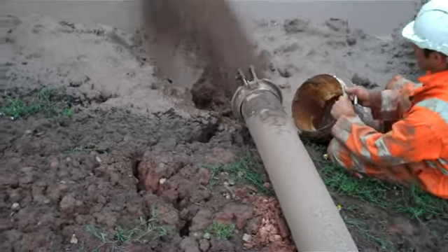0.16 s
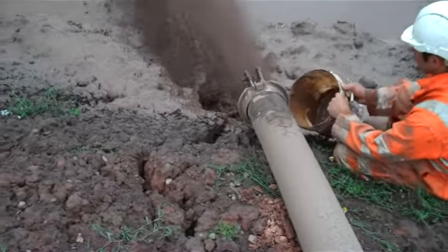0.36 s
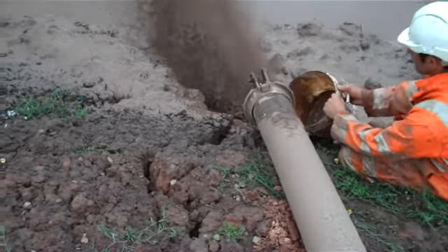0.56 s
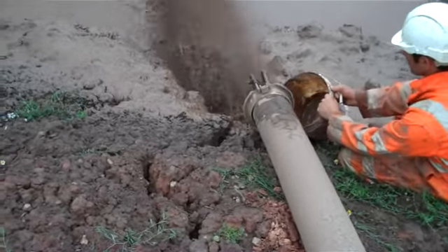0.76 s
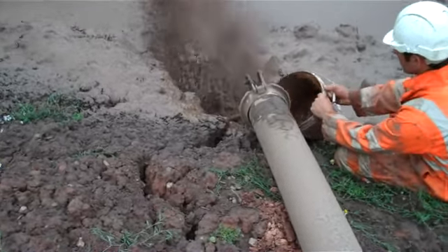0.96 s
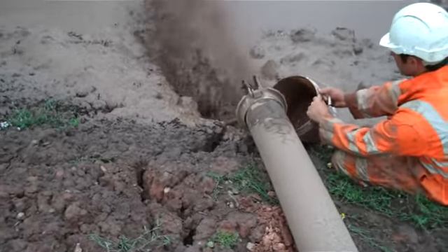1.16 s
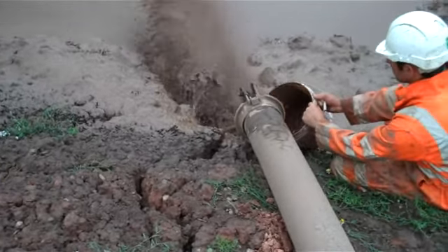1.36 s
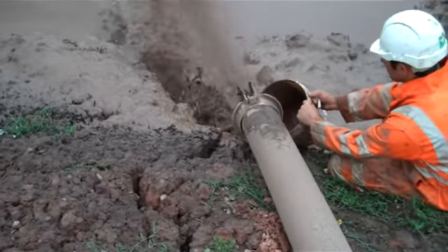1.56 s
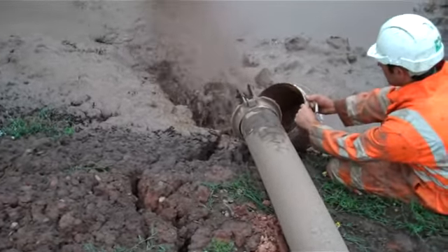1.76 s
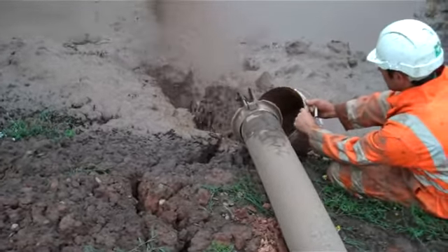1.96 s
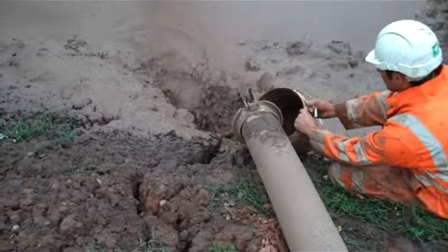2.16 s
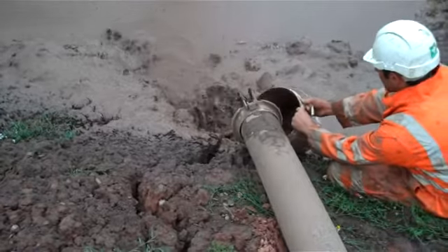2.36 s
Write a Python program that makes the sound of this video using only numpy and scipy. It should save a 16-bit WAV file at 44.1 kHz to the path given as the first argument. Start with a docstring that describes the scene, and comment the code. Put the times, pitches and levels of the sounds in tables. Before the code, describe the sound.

A close outdoor jet of muddy slurry hisses and spits throughout, strongest early, while the landing grows more gulping and lumpy after one second; sharp drops snap, and noise reduction leaves the rush hollow and watery.

```python
"""A jet of thick slurry and air rushes from a discharge pipe and spits fine spray, outdoors and close by.
Where it lands on wet mud it slaps, gulps and gurgles; heavy lumps plop, and a few drops snap sharply.
Spray, jet and landing are rains of damped rings over coloured hiss; air sputters at the mouth.
The recorder's noise reduction hollows the weaker bands, and its overload crisps the sharpest snaps."""
import sys
import numpy as np
from scipy import signal
from scipy.fft import rfft, irfft, next_fast_len
from scipy.io import wavfile
from scipy.ndimage import map_coordinates

SR = 44100
rng = np.random.default_rng(int(sys.argv[2]) if len(sys.argv) > 2 else 0)


def waveform_to_disk(signal):
    """Save audio, clipped to [-1, 1], as 16-bit WAV at the path in sys.argv[1]."""
    frames = np.transpose(np.atleast_2d(signal))
    scaled = np.clip(frames, -1, 1) * 32767
    samples = np.round(scaled).astype(np.int16)
    wavfile.write(sys.argv[1], SR, samples)


N = 110250  # samples, 2.5 s

# Colours shape noise and bubbles before levelling: freq_hz, level_db (relative)

# Fine spray in the air, ahead of SPRAY_TRIM_DB: time_s, level_db
SPRAY_LEVEL = [(0, -24), (.08, -26), (.11, -21.5), (.232, -24.5), (.257, -16), (.325, -16), (.365, -20),
               (.42, -19.5), (.47, -23.5), (.53, -20.5), (.66, -22), (.8, -22.5), (.89, -21), (1.02, -24),
               (1.18, -22), (1.28, -23), (1.32, -26.5), (1.4, -23.5), (1.46, -27.5), (1.55, -22),
               (1.62, -26), (1.7, -21.5), (1.81, -25.5), (1.91, -20.5), (1.96, -24), (2.06, -24),
               (2.19, -24), (2.24, -28.5), (2.27, -23.5), (2.43, -23), (2.5, -26)]
# Colour of the spray: freq_hz, level_db
SPRAY_TONE = [(2500, -50), (3900, -14), (4450, -7.5), (5200, -3.5), (5950, -1.5), (9000, -3)]
# Midrange rush of the jet, ahead of JET_TRIM_DB: time_s, level_db
JET_LEVEL = [(0, -24), (.04, -28.5), (.14, -28), (.21, -24), (.29, -24.5), (.36, -28), (.56, -28.5),
             (.63, -27), (.77, -30), (.94, -27.5), (1, -32), (1.05, -29.5), (1.25, -28.5), (1.34, -32),
             (1.38, -28), (1.62, -29.5), (1.69, -27), (1.76, -27), (1.8, -30), (1.9, -26.5), (2.07, -27.5),
             (2.14, -30), (2.4, -28.5), (2.46, -32), (2.5, -32.5)]
# Colour of the rush: freq_hz, level_db
JET_TONE = [(700, -27.5), (1200, -8), (1550, -6), (2000, -3.5), (2650, -1.5), (3350, 0.5), (3950, 0.5),
            (4600, -2), (6500, -40.5)]
# Air pockets bursting at the pipe mouth: centre_s, width_s, level_db
AIR_BURSTS = [(0.168, 0.0053, -24), (0.202, 0.0024, -23), (0.225, 0.0066, -23), (0.269, 0.0052, -24),
              (1.896, 0.008, -20.5), (1.921, .004, -25), (1.961, 0.0072, -15.5), (2.009, 0.0039, -20),
              (2.483, 0.0078, -28)]
# Colour of the bursts: freq_hz, level_db
AIR_BURST_TONE = [(600, -22), (1800, -15), (2300, -10), (2750, -1.5), (3300, -9.5), (3900, -5.5),
                  (5000, -31.5)]
# Stream landing on mud, ahead of the slap and gurgle trims: time_s, slap_db, gurgle_db
LANDING_LEVEL = [(0, -35, -37), (.17, -33.5, -36), (.29, -36.5, -37), (.33, -38, -35.5), (.47, -36.5, -39),
                 (.55, -34.5, -36.5), (.7, -36, -37.5), (.8, -36.5, -34.5), (.88, -34.5, -35),
                 (.98, -37, -37.5), (1.04, -37.5, -33), (1.15, -37, -37.5), (1.27, -33, -33),
                 (1.34, -36, -38), (1.39, -34.5, -29), (1.5, -35.5, -35.5), (1.64, -35, -35.5),
                 (1.74, -32.5, -29.5), (1.82, -35, -33.5), (1.91, -35.5, -31.5), (2.04, -33.5, -33.5),
                 (2.17, -37, -39), (2.29, -34.5, -38.5), (2.36, -38.5, -38), (2.5, -37.5, -39.5)]
# Colour of the wet slaps: freq_hz, level_db
SLAP_TONE = [(250, -34.5), (480, -3), (700, -6.5), (880, -2), (1020, -2), (1280, -2), (1500, -9),
             (1850, -12), (3000, -28.5)]
# Hollow gulping in the pit the stream digs, ahead of PIT_TRIM_DB: time_s, level_db
PIT_LEVEL = [(0, -39.5), (.17, -38.5), (.22, -41), (.42, -39), (.55, -42.5), (.78, -40.5), (.83, -36),
             (.91, -33), (.97, -46), (1.06, -38.5), (1.21, -34.5), (1.32, -41), (1.41, -32), (1.52, -37.5),
             (1.73, -31.5), (1.8, -36), (1.91, -36.5), (1.97, -38.5), (2.3, -35.5), (2.5, -42)]
# Colour of the pit: freq_hz, level_db
PIT_TONE = [(420, -28.5), (540, -3.5), (650, 1), (740, -1.5), (950, -2.5)]
# Colour of the large bubbles in the mud: freq_hz, level_db
GURGLE_TONE = [(110, -52.5), (160, -12), (200, -6), (262, -1), (320, -3), (400, -3.5), (560, -19),
               (1200, -56)]
# Colour of the low rumble: freq_hz, level_db
RUMBLE_TONE = [(20, -6.5), (70, -5.5), (140, -1), (300, -21.5), (600, -34.5)]
# Gobs splashing down: centre_s, width_s, slap_db, spray_db
GOBS = [(0.286, 0.01, -28, -27.5), (0.527, .012, -37, -17), (1.26, 0.0054, -36, -21),
        (1.371, 0.0065, -35, -13), (1.694, .01, -36, -29), (1.748, 0.0049, -31.5, -18),
        (1.886, 0.0086, -28.5, -28), (2.013, 0.011, -33, -16.5), (2.085, .006, -28.5, -29),
        (2.19, 0.0022, -39, -15), (2.407, 0.0082, -29, -27)]
# Lumps landing and the air pockets they trap: start_s, pitch_hz, level_db
LUMPS = [(.0, 166, -30.5), (.045, 116, -30), (0.145, 159, -34), (.295, 734, -30.5), (0.514, 242, -34),
         (0.569, 149, -33.5), (0.744, 147, -30.5), (0.864, 141, -34), (0.891, 135, -29.5), (.906, 325, -30),
         (0.99, 164.6, -37), (1.026, 362, -32), (1.186, 298, -30.5), (1.249, 163, -29), (1.284, 263, -28),
         (1.362, 266, -22.5), (1.372, 715, -30), (1.427, 254, -24.5), (1.565, 243, -28.5),
         (1.596, 93, -28.5), (1.682, 284, -31), (1.695, 662, -29), (1.726, 252, -27), (1.739, 368, -27),
         (1.749, 631, -26.5), (1.775, 268, -30), (1.879, 219, -27.5), (1.895, 481, -27), (1.897, 702, -24),
         (1.942, 312, -29), (1.976, 247, -32.5), (2.183, 172, -32.5), (2.33, 286, -32.5), (2.44, 130, -33)]
# Single sharp drops, ahead of the recorder: centre_s, pitch_hz, peak_db
SHARP_DROPS = [(0.2605, 5280, -4.5), (0.307, 5410, -5.5), (.329, 5360, -10.5), (0.7562, 5300, -14.5),
               (2.3983, 5620, -1), (2.3997, 5660, -10)]
# Microphone response: freq_hz, gain_db
MICROPHONE_RESPONSE = [(6000, -0.5), (6120, -17), (6350, -9), (6480, -26), (7700, -19), (8300, -28.5),
                       (8750, -40)]
# Threshold of the recorder's noise reduction: freq_hz, level_db (per Hz)
NOISE_THRESHOLD = [(60, -50.5), (130, -56), (190, -69), (260, -65.5), (350, -65.5), (430, -63.5),
                   (650, -66.5), (1000, -66), (1500, -63.5), (2500, -67), (3500, -64.5), (4000, -67.5),
                   (4800, -61.5), (6000, -66)]

SPRAY_TRIM_DB, JET_TRIM_DB = 4, 1.18
SLAP_TRIM_DB, PIT_TRIM_DB, GURGLE_TRIM_DB, RUMBLE_DB = 2, -0.7, -1, -43.5
HOLLOW_HZ, HOLLOW_WIDTH_HZ, HOLLOW_WANDER_HZ, HOLLOW_DB = 3930, 150, 130, -6  # a wandering dip
PLOP_RISE_S, PLOP_T60_S, PLOP_GLIDE_PER_S = 0.008, 0.085, -2.7  # glide as a fraction of pitch
SNAP_WIDTH_S = 0.00052
SUPPRESS_DEPTH_DB, SUPPRESS_KNEE_DB, SUPPRESS_BLUR_HZ, SUPPRESS_BLUR_S = -15, .6, 13, .008
CLIP_LEVEL = .74  # full scale is 1
BAND_HZ, TOP_HZ = 8800, 15500


def amp(db):
    """Decibels to amplitude."""
    return 10 ** (np.asarray(db) / 20)


def unit(x):
    """x brought to rms 1."""
    return x / np.sqrt(np.mean(x ** 2) + 1e-20)


def clock():
    """The time of every sample in seconds."""
    return np.arange(N) / SR


def curves(rows):
    """One value per sample for each column after the time."""
    time_s, *columns = np.transpose(rows)
    return [np.interp(clock(), time_s, column) for column in columns]


def wobble(rate):
    """A smooth random curve, rate knots a second."""
    knots = rng.standard_normal(int(N * rate / SR) + 4)
    return map_coordinates(knots, [clock() * rate])


def bell(u):
    """A Gaussian bell of height 1."""
    return np.exp(-.5 * u ** 2)


def swell(centre_s, width_s):
    """A bell-shaped surge in time."""
    return bell((clock() - centre_s) / width_s)


def filtered(x, response):
    """x times a response of frequency."""
    size = next_fast_len(N + 8192)
    hz = np.fft.rfftfreq(size, 1 / SR)
    return irfft(rfft(x, size) * response(hz), size)[:N]


def coloured(x, tone):
    """x through a tone table, joined up on a log frequency axis."""
    freq_hz, level_db = np.transpose(tone)
    return filtered(x, lambda hz: amp(np.interp(np.log(hz + 1), np.log(freq_hz), level_db)))


def hiss(tone):
    """Coloured noise of rms 1."""
    return unit(coloured(rng.standard_normal(N), tone))


def bubbles(rate, low_hz, high_hz, cycles, spread_db, glide):
    """A random rain of damped rings, rate a second, whose pitch rises by glide as they fade; rms 1."""
    when, pitch, size, life = rng.random((int(rate * N / SR), 4)).T[:, :, None]
    hz = low_hz * (high_hz / low_hz) ** pitch
    k = np.arange(int(1.5 * cycles * SR / low_hz) + 2)
    age = k / SR * hz / (cycles * (.5 + life))  # 1 when a ring has fallen by 60 dB
    phase = 2 * np.pi * hz * k / SR * (1 + glide * np.minimum(age, 1) / 2)
    ring = np.sin(phase) * amp(-60 * age) * (1 - np.exp(-20 * age))
    size_db = spread_db * np.minimum(-np.log(1 - size), np.log(50))
    gain = amp(size_db) * np.sqrt(hz)
    place = (when * N).astype(int) + k
    return unit(np.bincount(place.ravel(), (gain * ring).ravel(), N)[:N])


def blurred(cells, hz, t, width_hz, width_s):
    """A weighted mean over neighbouring frequencies and moments."""
    across_hz = bell((hz[:41] - hz[20]) / width_hz)
    across_s = bell((t[:61] - t[30]) / width_s)
    weights = np.outer(across_hz, across_s)
    return signal.fftconvolve(cells, weights / weights.sum(), "same")


def patchy(x, patchy_db, patch_hz, patch_s):
    """Random patches of the spectrum are lifted and hollowed, as by noise reduction, with a wandering dip; rms 1."""
    hz, t, z = signal.stft(x, SR, nperseg=512)
    field = unit(blurred(rng.standard_normal(z.shape), hz, t, patch_hz, patch_s))
    patches_db = patchy_db * np.minimum(field, 1)
    centre_hz = HOLLOW_HZ + HOLLOW_WANDER_HZ * np.interp(t, clock(), wobble(20))
    dip_db = HOLLOW_DB * bell((hz[:, None] - centre_hz) / HOLLOW_WIDTH_HZ)
    return unit(signal.istft(z * amp(patches_db + dip_db), nperseg=512)[1][:N])


def spray():
    """Fine droplets crackle over a hiss and flare with each splash."""
    level_db, = curves(SPRAY_LEVEL)
    drops = bubbles(rate=4200, low_hz=4284, high_hz=6620, cycles=14.4, spread_db=1.14, glide=0.072)
    drops_and_hiss = drops + amp(2.0) * unit(rng.standard_normal(N))
    fizz = patchy(coloured(drops_and_hiss, SPRAY_TONE), patchy_db=2.0, patch_hz=200, patch_s=0.014)
    flares = sum(amp(db) * swell(s, width_s) for s, width_s, _, db in GOBS)
    flutter_db = .4 * wobble(45)
    steady = amp(level_db + SPRAY_TRIM_DB + flutter_db)
    return fizz * np.hypot(steady, flares)


def sputters():
    """Pockets of air burst at the mouth in brief surges of short rings."""
    bursts = sum(amp(db) * swell(s, width_s) for s, width_s, db in AIR_BURSTS)
    rings = bubbles(rate=2500, low_hz=1470, high_hz=4020, cycles=6.3, spread_db=0.0, glide=.08)
    return bursts * unit(coloured(rings, AIR_BURST_TONE))


def jet():
    """The stream tears apart in the air; long narrow rings add sustained, warbling strands to the rush."""
    level_db, = curves(JET_LEVEL)
    tearing = bubbles(rate=1800, low_hz=1093, high_hz=4560, cycles=22, spread_db=2.0, glide=.08)
    strands = bubbles(rate=420, low_hz=1102.6, high_hz=3791, cycles=280, spread_db=0.65, glide=.012)
    rush = unit(coloured(tearing + amp(2.0) * strands, JET_TONE)) + amp(-2) * hiss(JET_TONE)
    rush = patchy(rush, patchy_db=2.5, patch_hz=37, patch_s=0.021)
    return rush * amp(level_db + JET_TRIM_DB) + sputters()


def landing():
    """The stream slaps on the mud, gulps in the pit it digs and churns large bubbles into it."""
    slap_db, gurgle_db = curves(LANDING_LEVEL)
    pit_db, = curves(PIT_LEVEL)

    slaps = bubbles(rate=700, low_hz=451.2, high_hz=2009, cycles=30, spread_db=0.0, glide=0.07)
    slaps = unit(coloured(slaps, SLAP_TONE)) + amp(1) * hiss(SLAP_TONE)
    slaps = patchy(slaps, patchy_db=3.5, patch_hz=34, patch_s=0.031)
    flares = sum(amp(db) * swell(s, width_s) for s, width_s, db, _ in GOBS)

    gulps = bubbles(rate=320, low_hz=481, high_hz=812, cycles=28.3, spread_db=1.0, glide=0.08)
    gulps = unit(coloured(gulps, PIT_TONE))
    gurgle = bubbles(rate=500, low_hz=160.5, high_hz=492, cycles=17.9, spread_db=-0.24, glide=0.15)
    gurgle = unit(coloured(gurgle, GURGLE_TONE))

    return (slaps * amp(slap_db + SLAP_TRIM_DB)
            + flares * hiss(SLAP_TONE)
            + gulps * amp(pit_db + PIT_TRIM_DB)
            + gurgle * amp(gurgle_db + GURGLE_TRIM_DB)
            + amp(RUMBLE_DB) * hiss(RUMBLE_TONE))


def plops():
    """Each lump opens a cavity that rings briefly and sinks in pitch."""
    out = np.zeros(N + SR)
    t = np.arange(SR // 5) / SR
    shape = (1 - np.exp(-(t / PLOP_RISE_S) ** 2)) * amp(-60 * t / PLOP_T60_S)
    shape = shape / shape.max()
    for start_s, pitch_hz, level_db in LUMPS:
        ring = np.sin(2 * np.pi * pitch_hz * t * (1 + PLOP_GLIDE_PER_S * t / 2))
        start = round(start_s * SR)
        out[start:start + len(t)] += amp(level_db) * shape * ring
    return out[:N]


def snaps():
    """Single drops snap with a few bright cycles."""
    out = np.zeros(N)
    for centre_s, pitch_hz, peak_db in SHARP_DROPS:
        cycles = np.sin(2 * np.pi * pitch_hz * (clock() - centre_s))
        out += amp(peak_db) * swell(centre_s, SNAP_WIDTH_S) * cycles
    return out


def suppressor(x):
    """Noise reduction turns down narrow bands that sink below threshold, so the rush warbles."""
    hz, t, z = signal.stft(x, SR, nperseg=1024, noverlap=768, scaling="psd")
    power = blurred(2 * np.abs(z) ** 2, hz, t, SUPPRESS_BLUR_HZ, SUPPRESS_BLUR_S)
    level_db = 10 * np.log10(np.abs(power) + 1e-20)
    freq_hz, threshold_db = np.transpose(NOISE_THRESHOLD)
    over_db = level_db - np.interp(np.log(hz + 1), np.log(freq_hz), threshold_db)[:, None]
    opened = (1 + np.tanh(over_db / SUPPRESS_KNEE_DB / 2)) / 2
    gain = opened + (1 - opened) * amp(SUPPRESS_DEPTH_DB)
    return signal.istft(z * gain, SR, nperseg=1024, noverlap=768, scaling="psd")[1][:N]


def overload(x):
    return x / (1 + np.abs(x / CLIP_LEVEL) ** 16) ** (1 / 16)


def scene():
    """The uneven flow makes jet and landing spurt together."""
    spurt_db = 0.37 * wobble(47.86)
    stream = (jet() + landing()) * amp(spurt_db)
    return (spray() + stream + plops() + snaps())[None]


def record(dry):
    """Noise reduction, the microphone's narrow band, then overload and a steep top limit."""
    x = coloured(suppressor(dry[0]), MICROPHONE_RESPONSE)
    x = overload(filtered(x, lambda hz: hz < BAND_HZ))
    return filtered(x, lambda hz: 1 / (1 + (hz / TOP_HZ) ** 40))[None]


dry = scene()
out = record(dry)
waveform_to_disk(out)
```